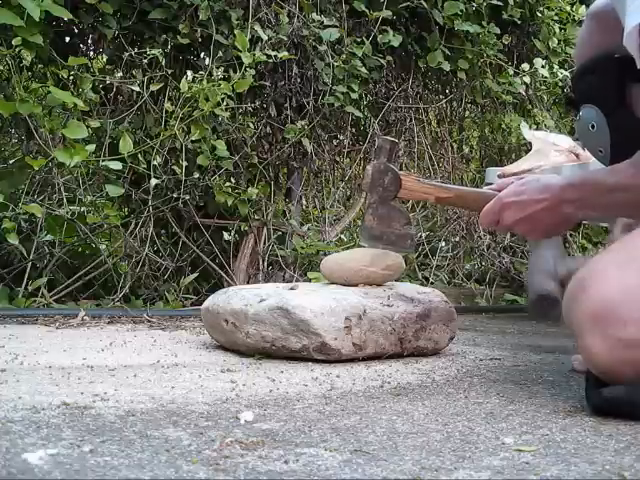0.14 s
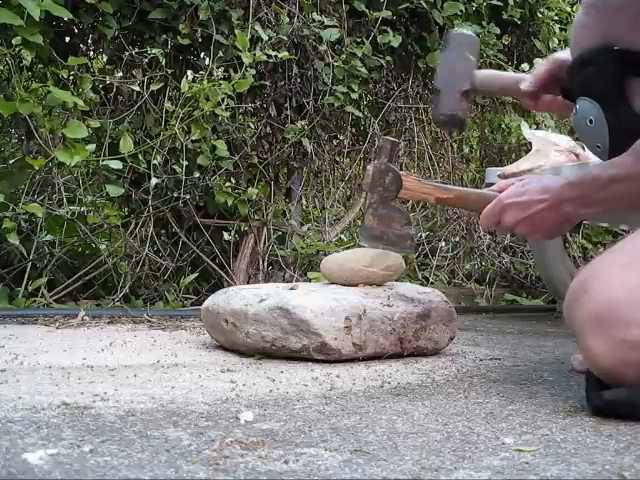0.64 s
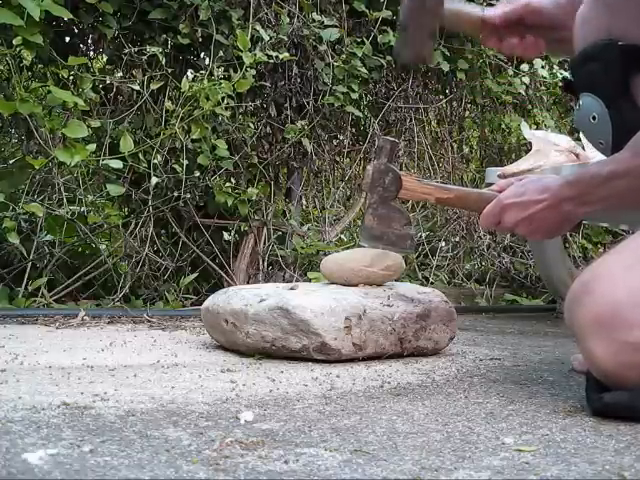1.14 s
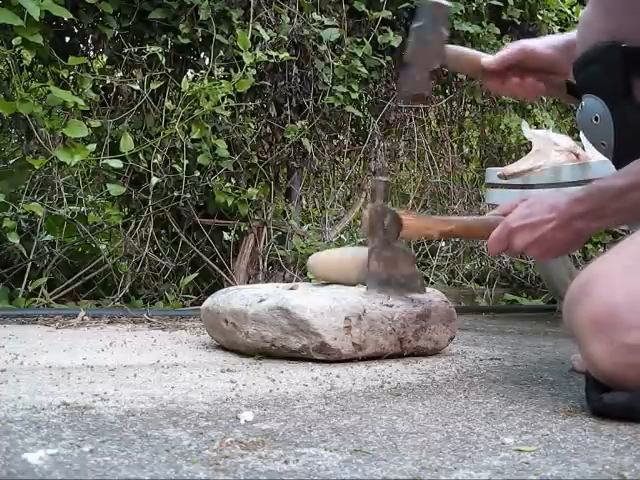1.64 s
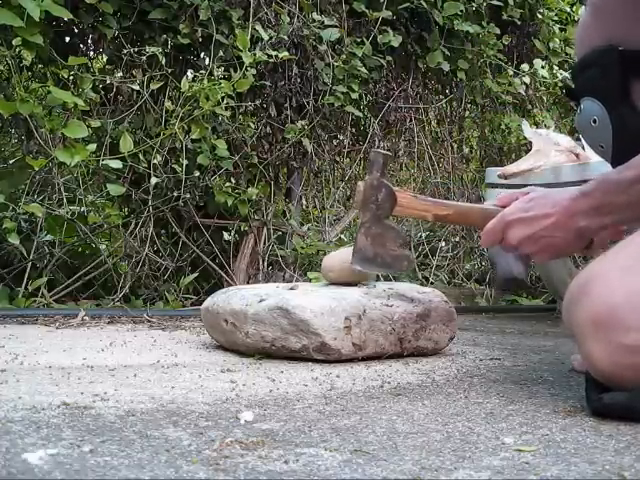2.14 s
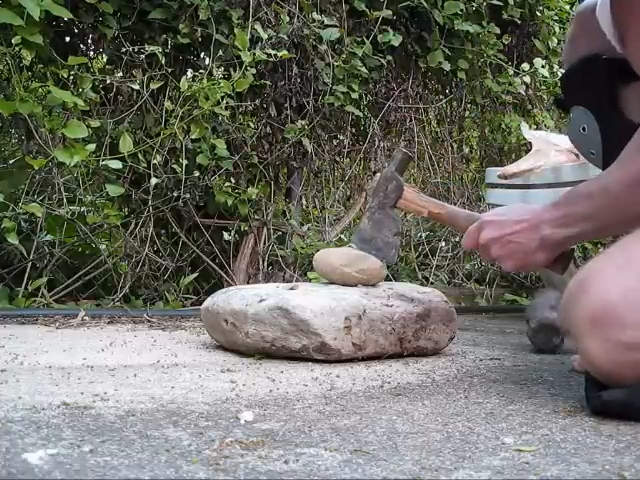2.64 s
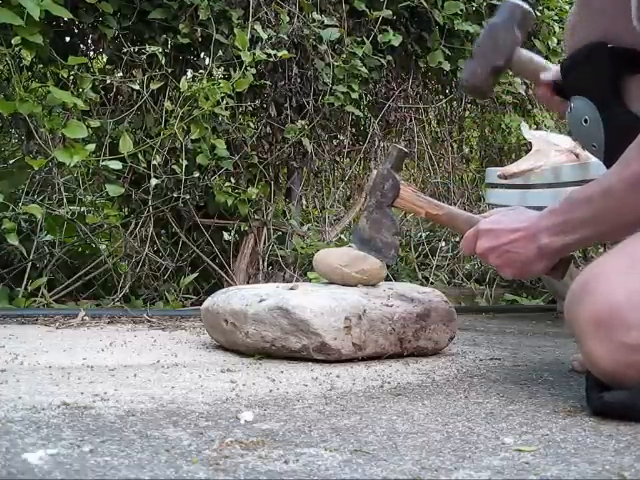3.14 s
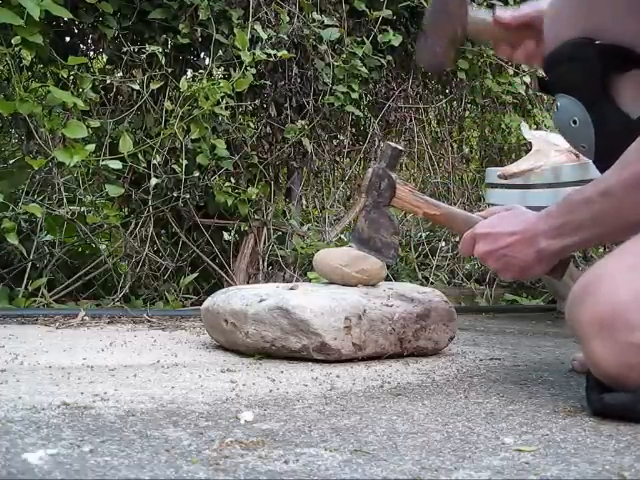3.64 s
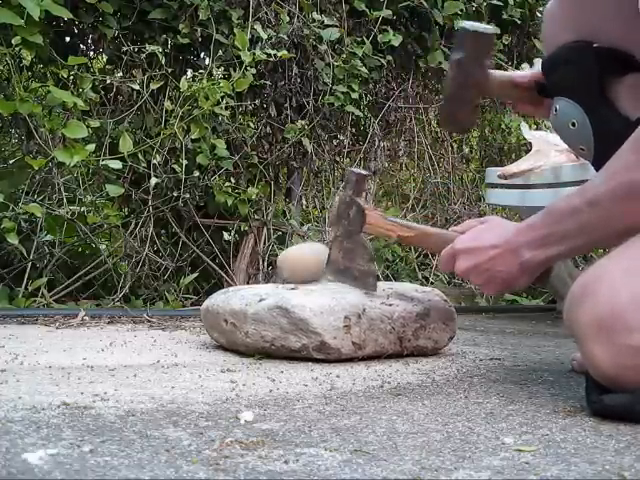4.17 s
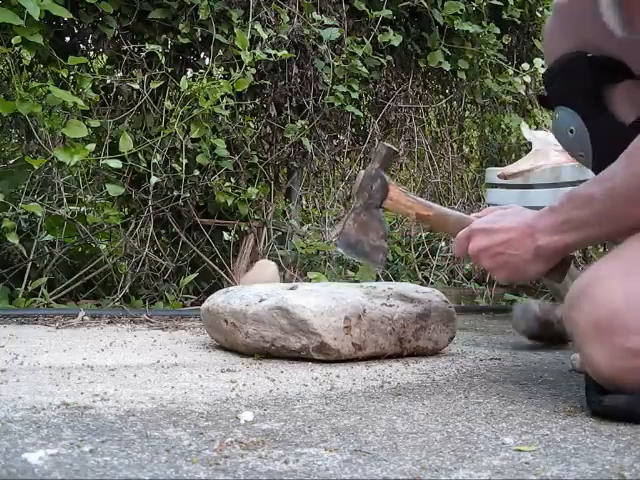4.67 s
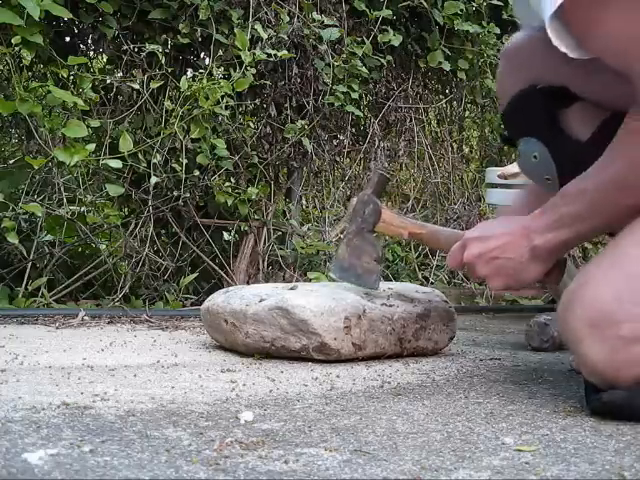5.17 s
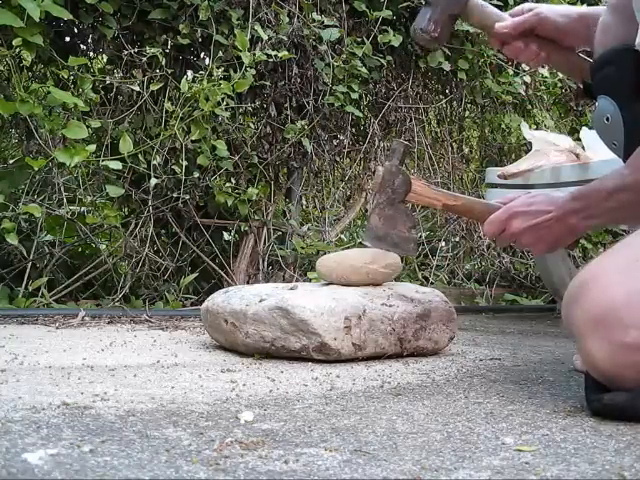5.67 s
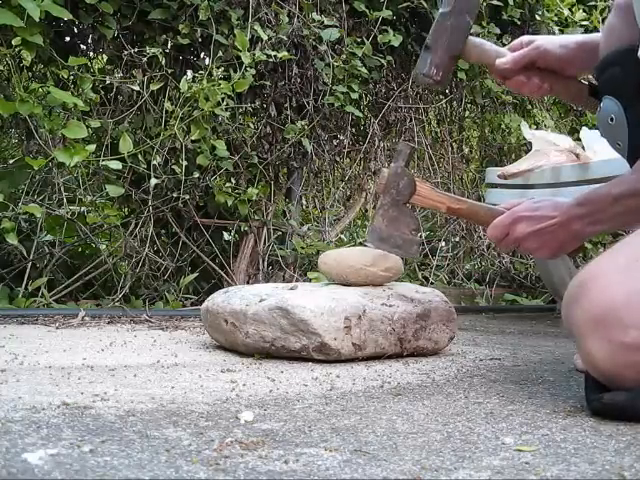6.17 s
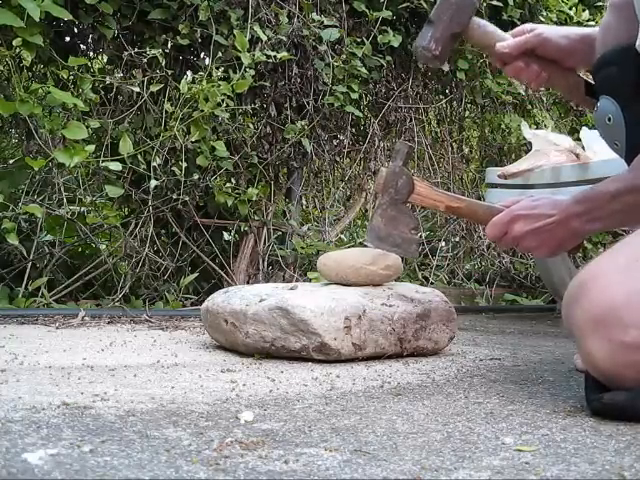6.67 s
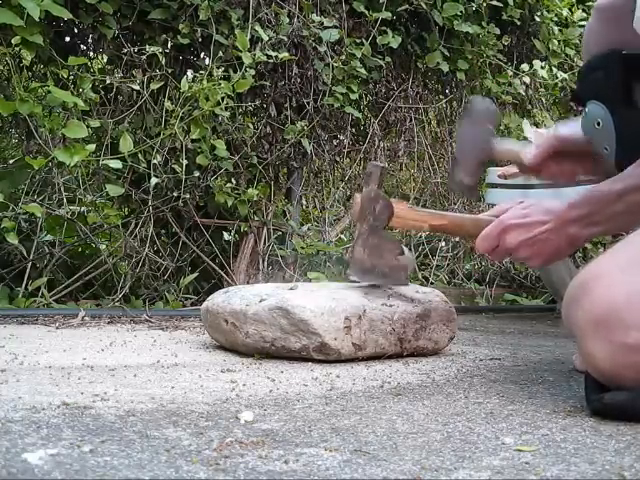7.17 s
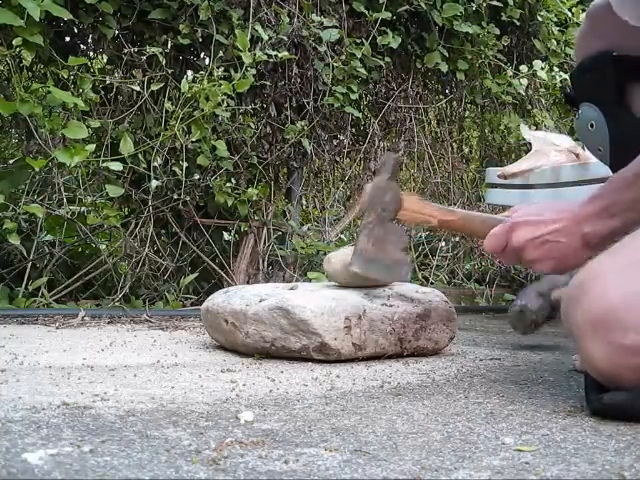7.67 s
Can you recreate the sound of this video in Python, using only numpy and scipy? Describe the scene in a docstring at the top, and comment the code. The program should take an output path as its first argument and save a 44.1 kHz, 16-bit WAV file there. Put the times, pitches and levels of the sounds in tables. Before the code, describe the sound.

Three hard, clipped steel-on-steel blows outdoors, each followed by a blade hitting rock, stone clatter and grit, over soft hiss.

```python
"""Hatchet hammered onto a cobble, outdoors

A heavy hammer drives a hatchet onto a rounded cobble that lies on a rock, outdoors on concrete.
Blows and blade landings are thumps, noise cracks and dying steel modes; the cobble knocks, clacks and grates
with its own modes, and grit ticks are noise bursts. Ground, walls and hedge return the hits, the last as a late
swell of noise, over a soft hiss with hum and rustle. Loud hits dip the gain and clip."""
import sys
import numpy as np
from scipy import signal
from scipy.fft import rfft, irfft
from scipy.io import wavfile
from scipy.ndimage import uniform_filter1d

SR = 44100
rng = np.random.default_rng(int(sys.argv[2]) if len(sys.argv) > 2 else 0)


def rack_gain(trim_db):
    """Turn a fader trim in dB into the linear factor to multiply a signal by."""
    fader = np.asarray(trim_db, float)
    return 10 ** (fader / 20)


def materialize(psi):
    """Save the field psi as 16-bit PCM at rate SR to the path in sys.argv[1].

    A 1-D psi becomes a single channel; in a 2-D psi each row is a channel.
    """
    bounded = np.clip(np.atleast_2d(psi).T, -1, 1)
    quanta = np.round(bounded * 32767).astype(np.int16)
    wavfile.write(sys.argv[1], SR, quanta)


N = 344414


def read(points, hz):
    """Spectrum table on a log-frequency axis."""
    f, value = np.transpose(points)
    return np.interp(np.log(hz + 1), np.log(f + 1), value)


def evened(x):
    """Scales to rms 1."""
    return x / np.sqrt(np.mean(x ** 2) + 1e-20)


def add(mix, s, sound):
    """Mixes a sound in at a time."""
    part = mix[round(s * SR):][:len(sound)]
    part += sound[:len(part)]


def coloured(x, gain):
    """Filters by gain(Hz)."""
    return irfft(rfft(x) * gain(np.fft.rfftfreq(len(x), 1 / SR)), len(x))


def hump(centre_hz, octaves):
    """Bell-shaped gain on an octave axis."""
    return lambda hz: np.exp(-(np.log2((hz + 1) / centre_hz) / octaves) ** 2)


def ring(modes, seconds):
    """Dying sines from (Hz, dB, t60 s) rows, damped over the last 3.7 ms."""
    t = np.arange(round(seconds * SR)) / SR
    sound = sum(rack_gain(db - 60 * t / max(t60, .003)) * np.sin(2 * np.pi * hz * t) for hz, db, t60 in modes)
    return sound * np.clip((seconds - t) / 0.0037, 0, 1)


def burst(gain, t60, rise_s=0.00028):
    """Coloured noise that rises fast and dies exponentially."""
    t = np.arange(8192) / SR
    noise = evened(coloured(rng.standard_normal(len(t)), gain))
    return noise * rack_gain(-60 * t / max(t60, .003)) * (1 - np.exp(-t / rise_s))


# outdoor hiss: (frequency [Hz], relative density [dB per Hz])
AIR_SPECTRUM = [(15, -43), (25, -29), (97, -1), (236, -4), (301, -2), (840, -4), (8140, -18),
                (14800, -25.5), (16000, -35)]
AIR_RMS_DB = -46.5


def hiss():
    """Outdoor hiss: noise whose level drifts in time-frequency patches."""
    frames, hz = N // 256 + 5, np.fft.rfftfreq(1024, 1 / SR)
    real, imag, patches = rng.standard_normal((frames, 513, 3)).T
    patches = evened(uniform_filter1d(uniform_filter1d(patches, 12, 0), 14, 1))
    z = (real + 1j * imag) * rack_gain(read(AIR_SPECTRUM, hz)[:, None] + 1.47 * patches)
    return rack_gain(AIR_RMS_DB) * evened(signal.istft(z, nperseg=1024, noverlap=768)[1][:N])


# far machine and thin whine: (centre [Hz], half width [Hz], level [dB rms])
HUM_BANDS = [(103.4, 4, -62), (14400, 8, -85)]


def hum():
    """Narrow noise bands, so each tone wavers."""
    out = np.zeros(N)
    for centre_hz, width_hz, db in HUM_BANDS:
        band = coloured(rng.standard_normal(N), lambda hz: 1 / (1 + ((hz - centre_hz) / width_hz) ** 2))
        out += rack_gain(db) * evened(band)
    return out


# leaves or clothes: (time [s], peak level [dB rms], half length [s])
RUSTLES = [(.55, -60, .06), (0.932, -55, .03), (2.11, -55, .02), (2.6, -53, .03), (3.1, -55, .05),
           (3.39, -54, .04), (4.625, -51, .028), (4.97, -53, 0.034), (5.277, -50, 0.05), (7.205, -52, .012),
           (7.752, -56.5, 0.14)]


def rustle():
    """Treble noise swelling and fading in bell-shaped swishes."""
    t = np.arange(N) / SR
    leaves = evened(coloured(rng.standard_normal(N), hump(11800, 0.56)))
    return leaves * sum(rack_gain(db) * np.exp(-((t - s) / half_s) ** 2) for s, db, half_s in RUSTLES)


# yard reflections: (frequency [Hz], relative gain [dB])
YARD_SPECTRUM = [(150, -8), (500, -9), (1200, -4), (2500, -1), (4000, -0.5), (7000, -2), (10000, -3),
                 (16000, -10)]
YARD_S = .55  # echo length
FAR_DB, FAR_PEAK_S, FAR_SHARP, FAR_HZ, FAR_OCTAVES = -61.5, .103, 2.1, 3200, 1.8


def far(x):
    """Walls and hedge hear hits from all sides: smoothed power, spread over a late swell, as noise."""
    hz, t, z = signal.stft(x, SR, nperseg=256)
    t = t[t < YARD_S] / FAR_PEAK_S
    swell = 128 * rack_gain(2 * FAR_DB) * (t * np.exp(1 - t)) ** (2 * FAR_SHARP)
    smoothed = uniform_filter1d(abs(z) ** 2, size=5, axis=0)
    power = signal.fftconvolve(smoothed, swell[None], axes=1)[:, :z.shape[1]]
    colour = evened(rack_gain(read(YARD_SPECTRUM, hz)) * hump(FAR_HZ, FAR_OCTAVES)(hz))[:, None]
    noise = signal.stft(rng.standard_normal(N), nperseg=256)[2]
    z = noise / np.sqrt(np.mean(abs(noise) ** 2)) * colour * np.sqrt(abs(power))
    return signal.istft(z, nperseg=256)[1][:N]


GROUND_S, GROUND_DB = .00145, -14.5  # echo off the concrete
NEAR_S, NEAR_DB, NEAR_FADE_DB, NEAR_TIME_S = .004, -34, -32, .011


def yard(x):
    """Direct sound, ground echo and fast-dying near scatter, then the swell from some tens of metres away."""
    t = np.arange(round(YARD_S * SR)) / SR
    scatter = evened(coloured(rng.standard_normal(len(t)), lambda hz: rack_gain(read(YARD_SPECTRUM, hz))))
    near_db = NEAR_DB + NEAR_FADE_DB * (1 - np.exp(-(t - NEAR_S) / NEAR_TIME_S))
    response = scatter * (t > NEAR_S) * rack_gain(near_db) * np.exp(-t / FAR_PEAK_S)
    response[0] += 1
    response[round(GROUND_S * SR)] += rack_gain(GROUND_DB)
    return signal.fftconvolve(x, response)[:N] + far(x)


# (time [s], relative level [dB], centre [Hz])
GRIT_TICKS = [(0.609, -33.5, 6940), (0.748, -26, 5190), (1.2305, -31.5, 5430), (1.419, -27, 11100),
              (1.442, -17.5, 6300), (1.707, -29, 10800), (1.7947, -36, 7000), (2.3726, -31, 5720),
              (2.8653, -31, 5800), (3.933, -24.5, 5150), (4.594, -22, 8440), (4.6444, -28, 6300),
              (4.6926, -32, 12500), (4.9271, -29, 13500), (5.269, -25.5, 7070), (5.2828, -20, 12100),
              (7.1644, -28, 13400), (7.197, -28, 13000), (7.388, -27, 3000), (7.401, -28, 12000)]
TICK_T60_S, TICK_OCTAVES = .012, 1.7
FAINT_PER_S, FAINTEST_DB, FAINT_HZ = 2.5, -48, 9500


def grit():
    """Short, wide noise ticks, plus faint ones at random moments."""
    faint = (rng.random(N) < FAINT_PER_S / SR) * rack_gain(FAINTEST_DB + 2.5 * np.minimum(rng.exponential(1, N), 2))
    mix = signal.oaconvolve(faint, burst(hump(FAINT_HZ, TICK_OCTAVES), TICK_T60_S))[:N]
    for s, db, centre_hz in GRIT_TICKS:
        add(mix, s, rack_gain(db - 5) * burst(hump(centre_hz, TICK_OCTAVES), TICK_T60_S))
    return mix


# low modes of the cobble: (nominal frequency [Hz], relative level [dB], t60 [s])
COBBLE_LOW_MODES = [(255, -6.5, 0.027), (431, 1, 0.029), (810, 0, 0.022)]
# cobble rolls and grates: (start [s], length [s], start level [dB], end level [dB])
COBBLE_ROLLS = [(1.525, .03, -32, -40), (2.16, .2, -52, -50), (2.47, .09, -48, -50), (4.2, .03, -34, -36),
                (4.23, .29, -42, -52), (4.6, .06, -32, -36), (4.8, .03, -44, -48), (4.86, .11, -46, -41),
                (5.11, .12, -39, -40), (5.25, .07, -30, -44), (5.33, .03, -34, -38), (7.26, .03, -42, -48)]


def rolling():
    """Uneven random bumps, some 700 a second, each exciting the low modes of the cobble."""
    level = np.zeros(N)
    for s, length_s, start_db, end_db in COBBLE_ROLLS:
        add(level, s, rack_gain(np.linspace(start_db, end_db, round(length_s * SR))))
    sizes = rack_gain(2.5 * np.minimum(rng.exponential(1, N), 3)) * rng.standard_normal(N)
    bumps = (rng.random(N) < 700 / SR) * sizes
    body = ring(COBBLE_LOW_MODES, .05) + 0.91 * burst(hump(400, 1.33), 0.029)[:round(.05 * SR)]
    scale = np.sqrt(np.mean(bumps ** 2)) * np.linalg.norm(body)
    return signal.oaconvolve(bumps * level, body)[:N] / scale


# dropped cobble: (time [s], relative level [dB], upper modes [dB], strongest low pitch [Hz])
FIRST_DROP = (7.386, -11.5, 9, 830)
BOUNCES, BOUNCE_S, BOUNCE_SHRINK, BOUNCE_DB, BOUNCE_DULL_DB = 4, .035, .71, -3.6, -2.6


def settling():
    """Knock rows of a dropped stone: each gap a share of the last, each bounce weaker and duller."""
    s, db, high_db, low_hz = FIRST_DROP
    k = np.arange(BOUNCES + 1)
    times = s + BOUNCE_S * (1 - BOUNCE_SHRINK ** k) / (1 - BOUNCE_SHRINK)
    return [(at, db + BOUNCE_DB * n, high_db + BOUNCE_DULL_DB * n ** 2, low_hz) for at, n in zip(times, k)]


# upper modes of the cobble: (nominal frequency [Hz], relative level [dB], t60 [s])
COBBLE_HIGH_MODES = [(1350, -3.5, 0.016), (1818, -6, 0.059), (2376, -6, 0.019)]
# cobble on rock, sounding 2-3 ms after:
# (time [s], relative level [dB], upper modes [dB], strongest low pitch [Hz])
COBBLE_KNOCKS = [(0.025, -21.5, -36, 430), (1.516, -12, -29, 420), (1.713, -19.5, 1, 859),
                 (1.723, -14.5, -4, 867), (1.749, -16.5, 0, 445), (1.889, -23.5, -16, 476),
                 (1.975, -14.5, -4, 764), (2.153, -25, -22, 363), (2.302, -20, -21, 291),
                 (2.488, -30, -7, 510), (2.614, -26, -13, 401), (4.055, -22, -6, 861),
                 (4.123, -19.5, 6.5, 786), (4.198, -23, -4, 834), (4.217, -12, -5.5, 412),
                 (4.285, -22, -17, 202), (4.591, -11.5, -1, 560), (4.758, -14.5, -16, 367),
                 (4.927, -15.5, -14, 250), (5.261, -17.5, -23, 820), (5.962, -22, 0, 266),
                 (7.204, -23.5, -13, 861), (7.232, -12, -8, 795), (7.354, -22.5, -16, 790),
                 (7.66, -27.5, -27, 478)]


def knocks():
    """Rough puff plus the stone's modes; the spot that touches favours one low mode."""
    mix, rows = np.zeros(N), COBBLE_KNOCKS + settling()
    detunings = 1 + 0.031 * rng.standard_normal((len(rows), 6))
    for (s, db, high_db, low_hz), detuning in zip(rows, detunings):
        low = [(hz, d - 8 * abs(np.log2(hz / low_hz)), t60) for hz, d, t60 in COBBLE_LOW_MODES]
        modes = low + [(hz, d + high_db - 4, t60) for hz, d, t60 in COBBLE_HIGH_MODES]
        modes = [(hz * f, d, t60) for (hz, d, t60), f in zip(modes, detuning)]
        add(mix, s + .003, rack_gain(db - 3) * ring(modes, .1))
        add(mix, s + 0.001975, rack_gain(db - 10.5) * burst(hump(low_hz, 0.86), 0.036, rise_s=0.00087))
        add(mix, s + .003, rack_gain(db + high_db - 3.5) * burst(hump(1340, 0.75), 0.021))
    return mix


# (frequency [Hz], relative level [dB], t60 [s])
CLACK_MODES = [(460, -6.5, 0.082), (930, -9, 0.062), (1396, 1.5, 0.058), (1983, -7, .11),
               (2677, 1.5, 0.035), (3425, 2, 0.034), (3900, 0.5, 0.047), (4665, -11.5, 0.035),
               (6800, -19, 0.032)]
# stone on stone: (time [s], relative level [dB], brightest [Hz], low body [dB], ringing [dB])
STONE_CLACKS = [(3.149, -14, 2440, -8, -18), (5.0925, -6, 1800, -16, -22), (5.0952, 4.5, 3100, -20, -13),
                (5.249, -11, 3900, -8, -16), (5.3247, -11.5, 1400, -9, -9)]
CLACK_OCTAVES, CLACK_T60_S, BODY_T60_S = 1.15, .03, .058


def clacks():
    """Hard, bright stone contact: modes near the brightest pitch, a noise crack and a low body."""
    mix = np.zeros(N)
    for s, db, bright_hz, low_db, ring_db in STONE_CLACKS:
        modes = [(hz, d - 5 * abs(np.log2(hz / bright_hz)), t60) for hz, d, t60 in CLACK_MODES]
        add(mix, s, rack_gain(db + ring_db) * ring(modes, .12))
        add(mix, s, rack_gain(db - 4.5) * burst(hump(bright_hz, CLACK_OCTAVES), CLACK_T60_S))
        add(mix, s, rack_gain(db + low_db) * burst(hump(600, 1.0), BODY_T60_S, rise_s=0.0016))
    return mix


def thump(width_s):
    """A heavy mass stops: a short push, then a deeper pull that shakes the cobble."""
    t = np.arange(2048) / SR
    push = 0.43 * np.exp(-((t - width_s) / (0.12 * width_s)) ** 2)
    pull = np.exp(-((t - 1.94 * width_s) / (0.86 * width_s)) ** 2)
    shake = np.pad(ring(COBBLE_LOW_MODES[1:], .04), (round(3 * width_s * SR), 2048))[:2048]
    return push - pull + 0.51 * shake


# (frequency [Hz], relative density [dB per Hz])
CRACK_SPECTRUM = [(180, -44), (300, -5.5), (656, 3), (1230, -4.5), (3130, 0.5), (4990, -6), (6520, -5),
                  (8360, -14), (12100, -6), (16000, -32)]


def crack(db, tilt_db, t60):
    """Steel on steel or stone: a sharp wide burst, tilted in dB per octave about 3 kHz."""
    return rack_gain(db - 6) * burst(lambda hz: rack_gain(read(CRACK_SPECTRUM, hz) + tilt_db * np.log2((hz + 1) / 3000)), t60)


# mode frequencies: ([Hz])
HAMMER_MODE_HZ = [7826, 9392, 12456]
# (relative level [dB], t60 [s])
HAMMER_DECAYS = [(-4.5, 0.091), (1, 0.05), (-3, .11)]


def hammer_modes():
    """Ring modes of the hammer head."""
    return [(hz, *row) for hz, row in zip(HAMMER_MODE_HZ, HAMMER_DECAYS)]


# mode frequencies, close pairs beat: ([Hz])
HATCHET_MODE_HZ = [1738, 1765, 5387, 8947, 8957, 10900, 11700, 13416, 13440]
# (struck on back [dB], struck on edge [dB], t60 [s])
HATCHET_DECAYS = [(-21, 5.5, 0.049), (-28, -19, 0.18), (-18, -18, 0.19), (-23.5, -36, 0.55),
                  (-34, -38, 0.45), (-32, -20, .03), (-27, -28, .06), (-2.5, -34, .33), (-17, -40, 0.15)]
BACK, EDGE = 0, 1


def hatchet_modes(place, tilt_db):
    """Hatchet modes for one place of impact, tilted in dB per octave."""
    return [(hz, row[place] + tilt_db * np.log2(hz / HATCHET_MODE_HZ[2]), row[-1])
            for hz, row in zip(HATCHET_MODE_HZ, HATCHET_DECAYS)]


# steel head brushed lightly: (time [s], hammer ring [dB], hatchet ring [dB])
STEEL_CLINKS = [(2.452, -51, -58), (2.492, -42, -50), (2.549, -48, -60), (2.62, -48, -60),
                (2.655, -46, -55), (4.765, -60, -45.5), (4.815, -46, -62)]


def clinks():
    """Light touches ring both heads briefly."""
    rings = np.zeros(N)
    for s, hammer_db, hatchet_db in STEEL_CLINKS:
        add(rings, s, rack_gain(hammer_db) * ring(hammer_modes(), .06))
        add(rings, s, rack_gain(hatchet_db) * ring(hatchet_modes(BACK, 0), .06))
    return rings


THUMP_PER_CRACK = .6  # dB per dB: the thump grows more slowly than the crack
# blade edge on rock: (time [s], crack [dB], brightness [dB per octave], ring [dB], time until blade rests [s])
BLADE_LANDINGS = [(1.6295, 2.5, .8, -13, 0.075), (4.1273, 3, 2.2, -14, .09), (7.0838, -4, .3, -13.5, 0.12)]
LANDING_T60_S, LANDING_THUMP_DB = .016, -12.7
EDGE_TILT_DB, EDGE_FOLLOW = -2.2, 2.6  # a brighter crack wakes higher modes


def landings():
    """The edge hits rock: impact (thump, crack) and, apart, hatchet ring until the blade rests."""
    impact, rings = np.zeros((2, N))
    for s, crack_db, tilt_db, hatchet_db, free_s in BLADE_LANDINGS:
        add(impact, s - .001, rack_gain(LANDING_THUMP_DB + THUMP_PER_CRACK * crack_db) * thump(.0004))
        add(impact, s, crack(crack_db, tilt_db, LANDING_T60_S))
        modes = hatchet_modes(EDGE, EDGE_TILT_DB + EDGE_FOLLOW * tilt_db)
        add(rings, s, rack_gain(hatchet_db) * ring(modes, free_s))
    return impact, rings


# hammer on back of hatchet:
# (time [s], crack [dB], brightness [dB per octave], hammer ring [dB], hatchet ring [dB], free blade ring [s])
HAMMER_BLOWS = [(1.4825, 11, -.8, -30, -38, .146), (3.991, 6, 1.2, -10, -20, 0.136),
                (6.9633, 8, 1, -30, -18, 0.23)]
BLOW_T60_S, BLOW_THUMP_DB = .021, -6.5
BACK_TILT_DB, BACK_FOLLOW = 2.4, .9  # a brighter crack wakes higher modes


def blows():
    """Steel drives steel: impact (thump, crack) and, apart, the ring of both heads."""
    impact, rings = np.zeros((2, N))
    for s, crack_db, tilt_db, hammer_db, hatchet_db, free_s in HAMMER_BLOWS:
        add(impact, s, rack_gain(BLOW_THUMP_DB + THUMP_PER_CRACK * crack_db) * thump(0.00057))
        add(impact, s + .0014, crack(crack_db, tilt_db, BLOW_T60_S))
        add(rings, s + 0.0034, rack_gain(hammer_db) * ring(hammer_modes(), .4))
        modes = hatchet_modes(BACK, BACK_TILT_DB + BACK_FOLLOW * tilt_db)
        add(rings, s + 0.0024, rack_gain(hatchet_db) * ring(modes, free_s))
    return impact, rings


RING_IN_YARD = 0.54  # share of steel ring that reaches the walls; the heads radiate it narrowly
ECHO_CUT_S = 5.362  # echoes of earlier hits break off here


def scene():
    """All hits in the yard, over the air; the stone sounds carry no deep bass."""
    blow_impact, blow_rings = blows()
    landing_impact, landing_rings = landings()
    rings = blow_rings + landing_rings + clinks()
    stones = knocks() + clacks() + rolling() + grit()
    stones = signal.lfilter(*signal.butter(2, 150, "high", fs=SR), stones)
    hits = blow_impact + landing_impact + stones + RING_IN_YARD * rings
    early = np.arange(N) < ECHO_CUT_S * SR
    echoed = yard(hits * early) * early + yard(hits * ~early)
    air = hiss() + hum() + rustle()
    return (echoed + (1 - RING_IN_YARD) * rings + air)[None]


def roll_off(x):
    """The treble ends steeply here."""
    return signal.sosfilt(signal.butter(12, 16340, fs=SR, output="sos"), x)


def record(dry):
    """Gain control dips after loud hits and recovers fast; the input clips at full scale."""
    power_db = 10 * np.log10(abs(uniform_filter1d(dry[0] ** 2, 100)) + 1e-12)
    fall_db = np.arange(N) * 133.0 / SR  # peak hold falls 133 dB/s
    held_db = np.maximum.accumulate(power_db + fall_db) - fall_db
    over_db = np.maximum(held_db + 13, 0)  # threshold -13 dB
    dip_db = signal.lfilter([.004], [1, -.996], .4 * over_db)
    mix = np.clip(dry / rack_gain(dip_db), -1, 1)
    return roll_off(mix)


dry = scene()
out = record(dry)
materialize(out)
```